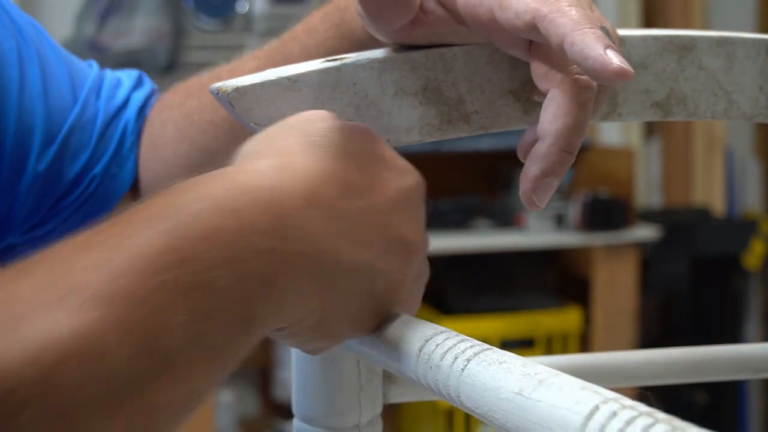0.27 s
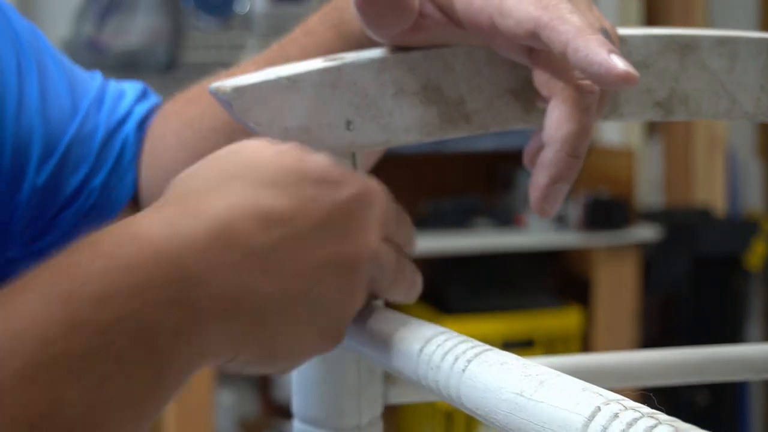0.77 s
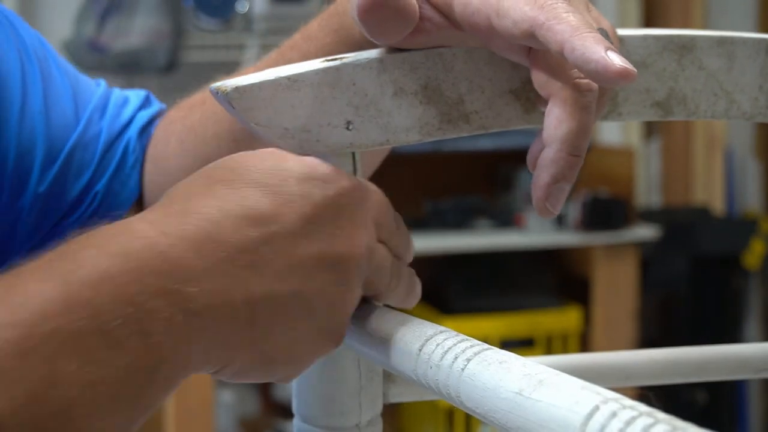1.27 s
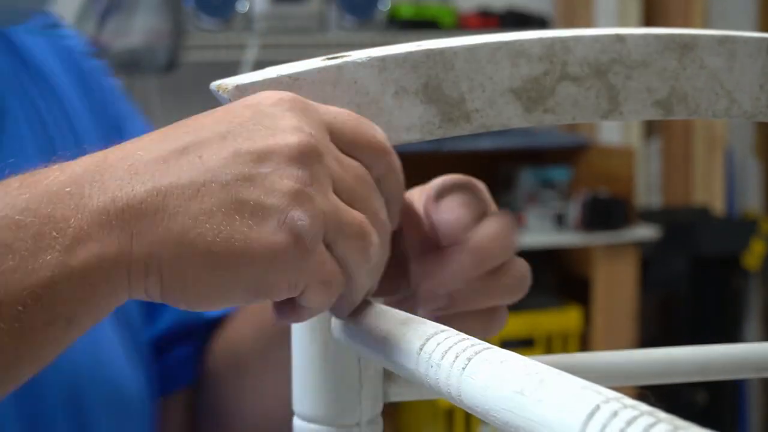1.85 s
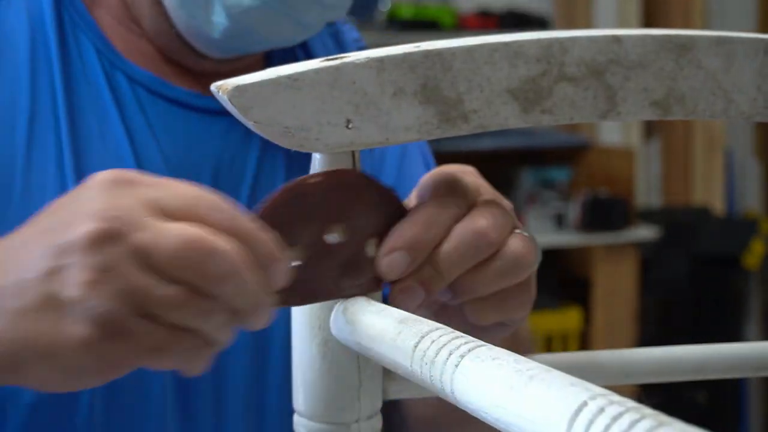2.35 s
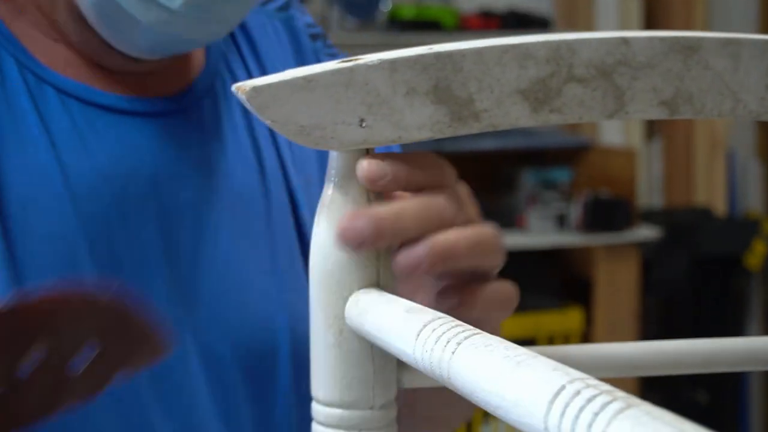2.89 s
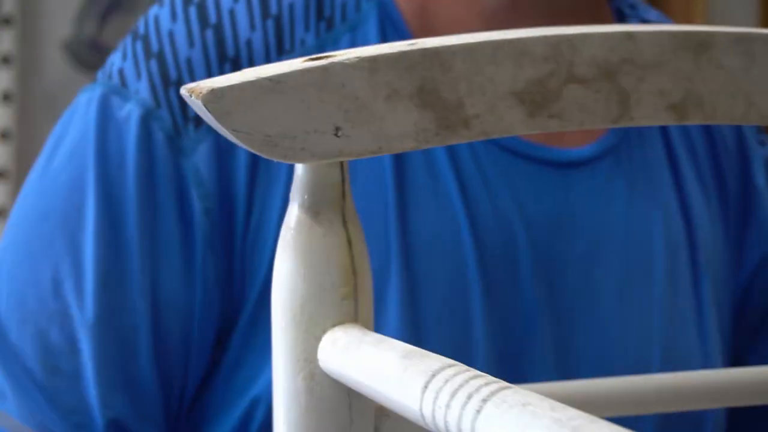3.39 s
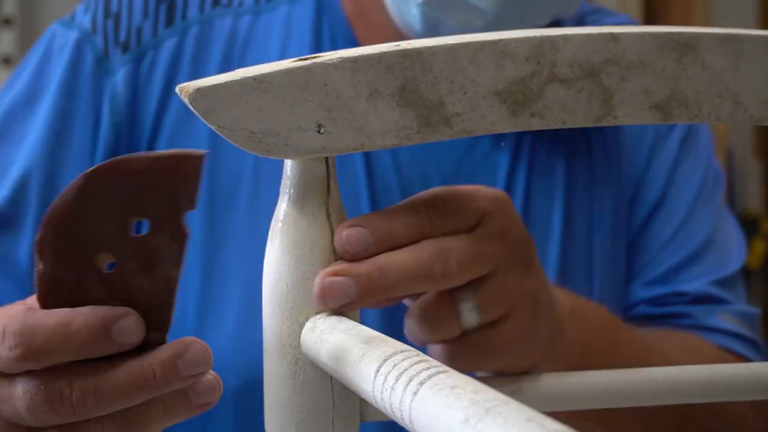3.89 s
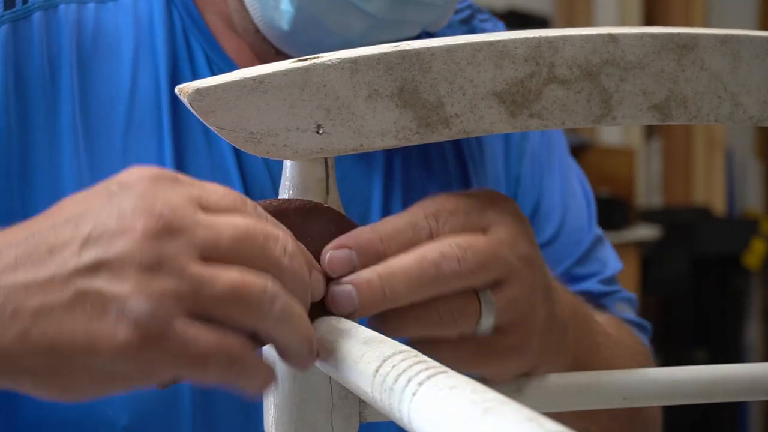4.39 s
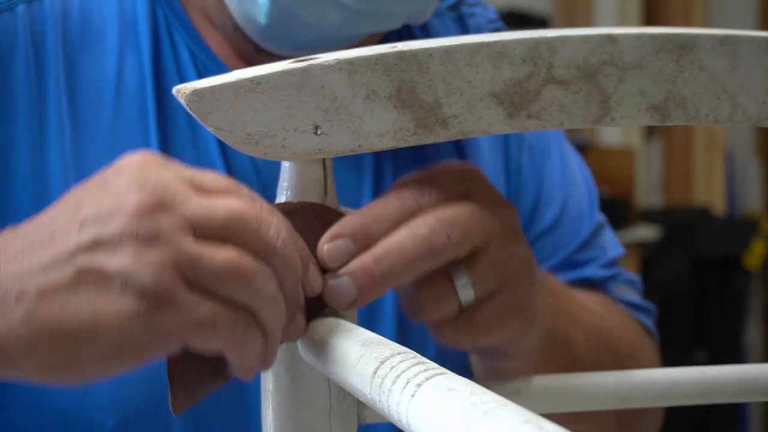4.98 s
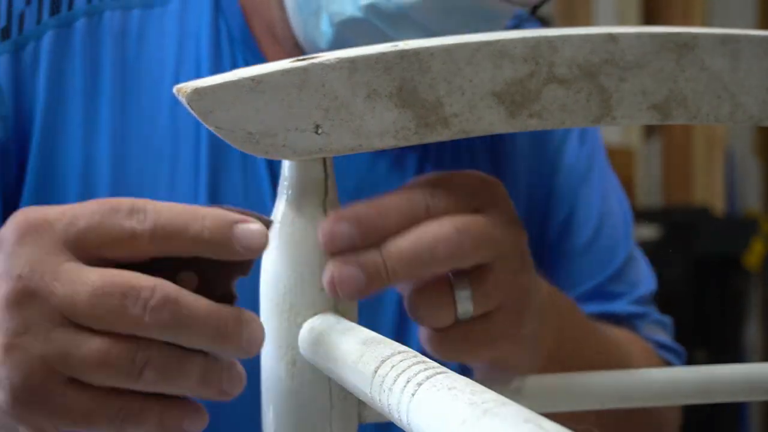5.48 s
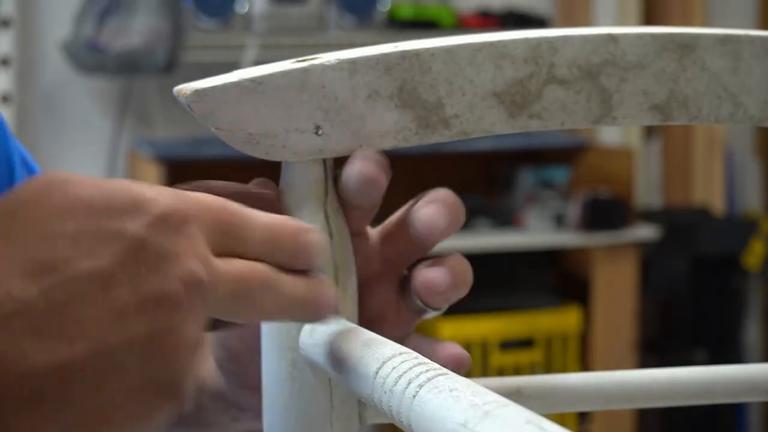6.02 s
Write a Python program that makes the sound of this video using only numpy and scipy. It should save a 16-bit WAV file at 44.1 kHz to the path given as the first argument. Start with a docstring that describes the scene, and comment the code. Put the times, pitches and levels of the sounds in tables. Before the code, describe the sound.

A close, speeded-up stereo sound of hand sanding on a wooden chair in a workshop. From 0 to 1.4 s, rapid raspy strokes, about 20 to 50 a second, chatter in uneven runs, gritty and hissy with a hollow woody boom and brief squeaky catches; a soft knock falls at 0.3. From 1.5 to 2 s there are only faint ticks and scuffs. Brighter, papery strokes run from 2.0 to 2.75, then heavy dull knocks with rattles and scuffs land near 2.85 and 3.1, the loudest moment. Soft slides and a scuff near 3.4 fade into a quiet gap. Sanding resumes at 4.2, lighter and drier, with soft knocks around 5 to 5.25. After a lull, paper slides at 5.7 and last quick strokes come near 6. Deep rumble swells irregularly throughout, strongest around 3 s, over faint room air and a thin high insect band; the stereo image shifts abruptly.

```python
"""A painted wooden chair leg is sanded by hand in a workshop, heard speeded up: runs of 20-50 strokes a second.
From the start, grit clicks hiss and ring the wood through resonators, over swelling deep noise and room air,
with a thin band of insects (narrow noise) outside; the phase between the channels jumps about throughout.
Slides, scuffs and dull thuds (shaped grain noise) come among the strokes and in the pauses; knocks on the chair
(decaying modes) peak near 3 s. Sanding resumes at 4.2 s, with softer knocks near 5 s and last strokes at 6 s."""
import sys
import numpy as np
from scipy import signal
from scipy.fft import rfft, irfft
from scipy.io import wavfile
from scipy.ndimage import uniform_filter1d

SR = 44100
rng = np.random.default_rng(int(sys.argv[2]) if len(sys.argv) > 2 else 0)


def file_out(sig):
    """Save sig as 16-bit WAV at sys.argv[1]."""
    # one column per channel
    cols = np.atleast_2d(sig).T
    # limit, then scale
    lim = np.clip(cols, -1, 1)
    pcm = np.round(lim * 32767).astype(np.int16)
    wavfile.write(sys.argv[1], SR, pcm)


N = 275625
TIME = np.arange(N) / SR   # s
HZ = np.maximum(np.arange(N // 2 + 1) * SR / N, 1)   # spectral bins, kept above zero for the logarithm

# the hold on the leg: [t/s, boom of the wood re body/dB, lift of lower and cut of upper resonances/dB,
# thump of the frame re body/dB, ring of the bent paper/dB]
HAND_HOLD = [(0, -3.5, 10.5, -29, -8), (1.15, -5.5, 10.5, -6.5, 10), (1.45, -3, 12.5, -24.5, 12),
             (2, -0.5, 9.5, -16, 9), (2.45, -4.5, 8, -20, 23.5), (2.8, -3.5, 6, -15.5, 9),
             (4.15, -1, 8, -22, 6), (4.4, -3, 3, -29, 18), (5.0, -7.5, 5, -8.5, 12), (5.3, -6, 3, -18, -14),
             (5.8, -7.5, 15.5, -38, -2), (6.1, -3.5, -1.5, -14, 4)]


def from_db(db):
    """Amplitude ratio: 20 dB is a factor of ten."""
    return 10 ** (np.asarray(db) / 20)


def rms_one(x):
    """Normalization by the root mean square."""
    return x / np.sqrt(np.mean(x ** 2) + 1e-20)


def in_time(rows):
    """Linear interpolation of each column over time."""
    s, *columns = np.transpose(rows)
    return [np.interp(TIME, s, c) for c in columns]


def colour(x, spectrum):
    """Spectral shaping: gain in dB is linear in log frequency, silent far outside the curve; rms 1."""
    hz, db = np.transpose(spectrum)
    gain = from_db(np.interp(np.log(HZ), np.log(hz), db, left=-110, right=-110))
    return rms_one(irfft(rfft(x) * gain, N))


def drift(rate):
    """Slow random modulation: normal values, rate per second, joined by straight lines."""
    knots = rng.standard_normal(800)
    return np.interp(TIME * rate, np.arange(800), knots)


def grains(per_s, uneven_db):
    """Shot noise: dense clicks at random moments, of random size and sign."""
    sizes = from_db(uneven_db * np.minimum(rng.exponential(1, N), 4)) * rng.choice([-1, 1], N)
    return rms_one(sizes * (rng.random(N) < per_s / SR))


def resonance(x, hz, width_hz):
    """Damped resonator: a two-pole band-pass of about unit gain at its peak."""
    r = np.exp(-np.pi * width_hz / SR)
    zeros = np.array([1, 0, -1]) * (1 - r * r) / 2
    poles = [1, -2 * r * np.cos(2 * np.pi * hz / SR), r * r]
    return signal.lfilter(zeros, poles, x)


def evened(x):
    """Envelope normalization: slow changes of level are divided out; rms 1."""
    power = uniform_filter1d(uniform_filter1d(x ** 2, size=700), size=700)
    return rms_one(x / np.sqrt(power + 1e-12))


def background():
    """Broadband and narrow-band noise: room air and a far chorus of insects."""
    # room air: [f/Hz, level/dB]
    air_spectrum = [(100, -2), (300, -9.5), (1000, -17), (3000, -28), (6000, -34.5), (15000, -49.5)]
    air_db, insect_db = -46, -59
    insect_hz, insect_width_hz = 7520, 880
    chorus = resonance(rng.standard_normal(N), insect_hz, insect_width_hz)
    chorus = rms_one(resonance(chorus, insect_hz, insect_width_hz))
    air = colour(rng.standard_normal(N), air_spectrum)
    air_swell, chorus_swell = from_db(1.5 * drift(8)), from_db(1.2 * drift(8))
    return from_db(insect_db) * chorus_swell * chorus + from_db(air_db) * air_swell * air


def rumble():
    """Amplitude modulation: deep noise, its own slow swells evened out, follows a level curve."""
    # deep noise: [f/Hz, level/dB]
    deep_spectrum = [(7.1, -22), (12, 3), (43, 5.5), (55, 3), (67, -3.5), (86, -10.5), (130, -51),
                     (170, -39)]
    # swells of the rumble: [t/s, level/dB]
    rumble_levels = [(0.0, -21), (0.09, -17), (0.14, -22), (0.33, -18), (0.465, -31), (0.575, -19),
                     (0.7, -24.5), (0.84, -15), (0.92, -28), (1.085, -15), (1.405, -24.5), (1.585, -19.5),
                     (1.785, -33.5), (2.025, -29), (2.105, -16.5), (2.175, -23.5), (2.405, -18),
                     (2.78, -13.5), (2.865, -8), (3.04, -25.5), (3.135, -7.5), (3.34, -21.5), (3.465, -14),
                     (3.645, -31), (3.765, -21), (3.985, -32), (4.25, -20), (4.5, -25), (4.68, -16),
                     (5.365, -17), (5.5, -31), (5.825, -32), (6.03, -18), (6.14, -32.5), (6.245, -35)]
    deep = colour(rng.standard_normal(N), deep_spectrum)
    power = uniform_filter1d(uniform_filter1d(deep ** 2, size=1500), size=1500)
    steady = rms_one(deep / np.sqrt(power + 0.014))
    return from_db(in_time(rumble_levels)[0]) * steady


def slide(s, rise_s, hold_s, fall_s):
    """Near-exponential envelope: the level in dB rises, holds and falls away."""
    edge_db, slope_exponent = 50.5, 0.83   # loss one rise or fall time away from the hold
    away = np.maximum(np.maximum((s - TIME) / rise_s, (TIME - s - hold_s) / fall_s), 0)
    return from_db(-edge_db * np.minimum(away, 4) ** slope_exponent)


def shuffle():
    """Friction as shaped shot noise: slides, scuffs and dull noisy thuds, and paper drawn lightly."""
    # slides, scuffs and dull noisy thuds, some during strokes or knocks:
    # [t when full/s, rise/s, hold/s, fall/s, dull level/dB, bright level/dB]
    scuff_rows = [(1.543, 0.031, 0.022, 0.5, -46.5, -51), (1.947, 0.75, 0.044, .04, -45.5, -43.5),
                  (2.721, 0.072, 0.027, 0.1, -35.5, -42), (2.836, 0.0078, 0.032, 0.073, -27, -33.5),
                  (3.021, 0.034, 0.014, 0.27, -33.5, -40), (3.114, 0.03, 0.0088, 0.1, -19.5, -40),
                  (3.299, 0.015, 0.089, 0.063, -52.5, -49.5), (3.407, 0.17, 0.057, 0.089, -29.5, -35),
                  (3.538, 0.03, 0.15, 0.065, -39, -44), (3.847, .04, 0.073, 0.34, -50, -48),
                  (3.897, 0.037, 0.016, 0.06, -50, -76), (4.011, 0.17, 0.081, 0.18, -54, -49),
                  (4.196, 0.012, 0.0022, 0.036, -31.5, -50), (5.177, 0.064, 0.157, 0.098, -43.5, -64),
                  (5.712, 0.093, 0.021, 0.12, -41, -46), (5.799, 0.089, 0.017, 0.22, -48, -40),
                  (6.025, 0.58, 0.079, 0.16, -49.5, -46)]
    # paper drawn along the leg: [t when full/s, rise/s, hold/s, fall/s, level/dB]
    drag_rows = [(4.193, .05, 0.23, 0.13, -46), (5.313, 0.058, 0.2, 0.16, -43),
                 (5.81, 0.058, 0.047, 0.054, -39.5), (6.096, 0.059, .2, .1, -48)]
    # dull part, bright part and paper drag: [f/Hz, level/dB]
    dull_spectrum = [(100, -2.5), (250, -3), (500, -4.5), (1000, -10.5), (1500, -16), (2500, -73)]
    bright_spectrum = [(800, -40), (1600, 9.5), (2500, 6.5), (4000, 3.5), (5000, -5.5), (7000, -9.5),
                       (10000, -25)]
    drag_spectrum = [(400, -51), (560, 8), (800, -11), (1200, 1), (1600, -20), (1950, 6.5), (2550, -2.5),
                     (2900, -14), (5000, -14.5)]
    dull_level, bright_level = np.zeros(N), np.zeros(N)
    for *times, dull_db, bright_db in scuff_rows:
        shape = slide(*times)
        dull_level += from_db(dull_db) * shape
        bright_level += from_db(bright_db) * shape
    drag_level = sum(from_db(db) * slide(*times) for *times, db in drag_rows)
    rub = grains(per_s=6000, uneven_db=2) * from_db(2 * drift(45))
    drag = colour(grains(per_s=19000, uneven_db=-6.5), drag_spectrum)
    dull, bright = colour(rub, dull_spectrum), colour(rub, bright_spectrum)
    return dull_level * dull + bright_level * bright + drag_level * drag


def knocks():
    """Modal impact: a soft contact builds up over some ms, strikes every mode nearly in step and rattles."""
    # knocks on the chair: [t/s, relative level/dB, contact/ms]
    knock_rows = [(0.304, -17, 7.1), (2.685, -21, 2.8), (2.833, -21.5, 0.48), (2.855, -9, 8.4),
                  (3.102, -22.5, 3.6), (3.112, -19, 0.62), (3.118, -8, 2.25), (3.168, -17.5, 4.2),
                  (3.195, -18, 3.3), (4.191, -40, 0.45), (4.8, -28.5, 3.9), (4.915, -29, 5.6),
                  (4.988, -22.5, 3.2), (5.056, -25.5, 2.2), (5.185, -15.5, 11), (5.24, -17.5, 8.7)]
    # modes of the struck chair: [f/Hz, relative level/dB, decay by 60 dB/s]
    chair_modes = [(53.9, 12.5, 0.26), (223, 12.5, 0.035), (245, 2, 0.068), (308.3, 5.5, 0.074),
                   (390, -3.5, 0.2), (479, 23.5, 0.017), (673, 2, 0.073), (910, 5, 0.027)]
    crack_db, crack_delay_s, crack_decay_s = -22, .004, 0.0015
    rattle_db, rattle_decay_s = -13, 0.013   # the joints rattle
    out = np.zeros(N)
    luck_db = rng.normal(0, 3, (len(knock_rows), len(chair_modes)))
    turns = rng.random((len(knock_rows), len(chair_modes)))
    hz, db, t60 = np.transpose(chair_modes)[:, :, None]
    after = np.arange(SR // 3) / SR
    hiss = np.diff(rng.standard_normal((len(knock_rows), len(after) + 1)))
    rattle_hz = np.arange(len(after) // 2 + 1) * SR / len(after)
    build_up = 1 - np.exp(-(after / 0.0067) ** 2)
    for k, (s, level_db, contact_ms) in enumerate(knock_rows):
        # a longer contact excites less of the treble
        strength = from_db(db + luck_db[k, :, None] - 60 * after / t60) / (1 + (hz * contact_ms / 1000) ** 2)
        cycles = hz * (after - 0.008) + 0.21 + 0.39 * (turns[k, :, None] - .5)
        ring = build_up * np.sum(strength * np.sin(2 * np.pi * cycles), axis=0)
        softness = (1 + (rattle_hz * contact_ms / 1000) ** 2) * (1 + (rattle_hz / 3500) ** 4)
        rattle = rms_one(irfft(rfft(hiss[k]) / softness, len(after)))
        ring += build_up * rattle * from_db(rattle_db) * np.exp(-after / rattle_decay_s)
        crack_shape = (after > crack_delay_s) * np.exp(-np.abs(after - crack_delay_s) / crack_decay_s)
        crack = signal.lfilter([1], [1, -.9], hiss[k]) * crack_shape
        ring += from_db(crack_db) / (1 + (contact_ms / 2) ** 2) * signal.lfilter([1], [1, -.75], crack)
        at = round(s * SR)
        out[at:at + len(after)] += from_db(level_db - 1.5) * ring[:N - at]
    return out


def strokes():
    """Reciprocating motion: rows (s, body dB, treble re body dB) in order; each second one of a run goes back."""
    # lone strokes: [t at the middle/s, body level/dB, treble re body/dB]
    lone_rows = [(0.31, -36.5, -5.5), (0.37, -29, -10.5), (0.499, -30.5, -18), (0.564, -29, -13),
                 (0.599, -34.5, -12), (0.65, -36, -16), (0.897, -48, -20), (2.025, -38, -10),
                 (2.066, -33.5, -8), (2.8, -29, -22), (2.845, -45, -1), (2.893, -29.5, -7),
                 (2.992, -47, -18), (3.016, -28.5, -9.5), (4.164, -38.5, 2.5), (4.749, -39.5, -2),
                 (4.787, -45, -14), (4.818, -33.5, -7), (5.834, -37, -7), (5.871, -42, -11),
                 (5.911, -32, -12), (6.045, -34.5, -8.5)]
    # runs of even strokes: [first t/s, last t/s, strokes, first level/dB, last level/dB, treble re body/dB,
    # back stroke early/ms, back stroke brighter/dB, back stroke weaker/dB]
    run_rows = [(0.007, 0.266, 7, -31.5, -28, -13, -3.5, 4, 2),
                (0.69, 0.859, 5, -29.5, -35.5, -14, 1, 6.5, 2),
                (0.937, 1.033, 5, -32, -35.5, -10.5, 1.5, 3, 5),
                (1.053, 1.095, 3, -40.5, -43.5, -11, -4, -5, -2),
                (1.12, 1.261, 8, -35, -38, -10.5, 2.1, 8, 2.5),
                (1.281, 1.426, 5, -36.5, -33.5, -12.5, 2.5, 7, 1.5),
                (2.113, 2.299, 5, -33.5, -32.5, -8, 3, -0.5, 0.9),
                (2.355, 2.754, 9, -33, -37, -5, 3, -1.5, -1.5),
                (4.197, 4.306, 5, -35.5, -46.5, -5.5, -1, 0.5, -3.5),
                (4.376, 4.566, 7, -39.5, -39, -8.5, 1.8, 6, -2),
                (4.603, 4.721, 5, -35.5, -31.5, -3.5, 2, 5, 4),
                (4.854, 5.086, 8, -33.5, -36, -7, 2, 3, -0.2), (5.12, 5.28, 6, -33, -32, -7, 3.5, 5, -1.7),
                (5.948, 6.019, 3, -29.5, -28, -10.5, -2, 1.5, -3)]
    uneven_db = 2   # chance from stroke to stroke
    rows = list(lone_rows)
    for first, last, count, first_db, last_db, treble_db, early_ms, brighter_db, weaker_db in run_rows:
        count = round(count)
        along, back = np.linspace(0, 1, count), np.arange(count) % 2
        luck_db = uneven_db * rng.standard_normal((count, 2))
        s = first + along * (last - first) - back * early_ms / 1000
        db = first_db + along * (last_db - first_db) - back * weaker_db + luck_db[:, 0]
        rows += zip(s, db, treble_db + back * brighter_db + luck_db[:, 1])
    return sorted(rows)


def swells(rows, fill, longest_s):
    """Level follows speed: body and treble of each stroke swell and fade with the hand's motion."""
    shortest_s = 0.017   # least half length, unless longest_s is less
    bite = .8   # under 1: a stroke starts faster than it ends
    s, db, treble_db = np.transpose(rows)
    gaps = np.diff(s, prepend=-1, append=99)
    half = np.clip(fill * np.minimum(gaps[:-1], gaps[1:]), shortest_s, longest_s)
    body, treble = np.zeros(N), np.zeros(N)
    for k in range(len(s)):
        at = slice(max(round((s[k] - half[k]) * SR), 0), round((s[k] + half[k]) * SR))
        along = np.clip((TIME[at] - s[k]) / half[k] / 2 + .5, 0, 1)
        speed = np.sin(np.pi * along ** bite) ** 2
        body[at] += from_db(db[k]) * speed
        treble[at] += from_db(db[k] + treble_db[k]) * speed ** 1.48
    return body, treble


def leg(x, ring_db):
    """Parallel resonances of the wood join the sound; the hold favours lower or upper ones, with some chance."""
    # the leg when rubbed: [f/Hz, width/Hz, relative level/dB]
    leg_modes = [(1755, 30, -4), (2121, 150, 1), (2448, 50, -4), (3150, 1500, 6), (3445, 62, 12.5),
                 (3850, 730, -2), (6040, 114, 0)]
    lower_db = in_time(HAND_HOLD)[1]
    rings = 0
    for hz, width, db in leg_modes:
        grip_db = 4 * drift(22) + lower_db * np.sign(2900 - hz)
        rings = rings + from_db(db + grip_db) * resonance(x, hz, width)
    return x + from_db(ring_db) * rings


def catches(grit):
    """Brief resonant excitation: the grit catches and the wood rings out, each time at one pitch."""
    # catches: [t at the middle/s, f/Hz, level/dB]
    catch_rows = [(0.367, 1900, -31.5), (0.492, 2310, -35), (0.564, 2040, -31.5), (0.687, 2470, -36),
                  (0.857, 2400, -36), (1.158, 3620, -34.5), (5.05, 2290, -25)]
    spread_s, width_share = .005, .07   # time to 1/e on either side; width over pitch
    out = np.zeros(N)
    for s, hz, db in catch_rows:
        burst = np.exp(-((TIME - s) / spread_s) ** 2)
        out += from_db(db) * burst * evened(resonance(grit, hz, width_share * hz))
    return out


def sanding():
    """Source and filter: grit tears at the paint in dense clicks that ring the wood, frame and bent paper."""
    # short light strokes and ticks: [t at the middle/s, body level/dB, treble re body/dB]
    short_rows = [(0.39, -38, -5), (1.008, -34.5, -4), (1.549, -43, -30), (1.65, -44, -10),
                  (1.665, -51, -14), (1.748, -51, -11), (1.883, -37.5, -16), (5.474, -48, 1.5),
                  (5.486, -52, 1), (6.102, -45, -13)]
    # scrape, treble and boom of the grit: [f/Hz, level/dB]
    scrape_spectrum = [(900, -94), (1500, -17), (2200, 6), (4000, 3.5), (5000, -2), (7000, -5.5)]
    treble_spectrum = [(3500, -84), (5000, -17.5), (7000, -8.5), (8500, -5.5), (10000, -9.5),
                       (12500, -17.5), (16000, -23)]
    boom_spectrum = [(120, 12), (300, -6), (550, 4), (1000, 0.5), (1300, -3), (2000, -10.5)]
    # the hollow of the paper bent round the leg: [f/Hz, width/Hz, relative level/dB]
    paper_modes = [(1670, 49, 2.5), (3170, 130, -13.5)]
    frame_hz, frame_width_hz = 297.7, 38
    treble_late_s = 0.0027   # the hiss of a stroke lags its body
    stroke_levels = swells(strokes(), fill=0.64, longest_s=0.039)
    body, treble = np.add(stroke_levels, swells(short_rows, fill=0.97, longest_s=0.0097))
    # the near walls carry each stroke a little way into the next
    fade = np.exp(-1 / (0.063 * SR))
    body += from_db(-14.0) * signal.lfilter([1 - fade], [1, -fade], body)
    treble = np.interp(TIME - treble_late_s, TIME, treble)
    treble += from_db(-12) * uniform_filter1d(treble, size=1800)
    grit = grains(per_s=14000, uneven_db=2.5) * from_db(1.3 * drift(110))
    boom_db, _, thump_db, paper_db = in_time(HAND_HOLD)
    boom = from_db(boom_db) * rms_one(leg(colour(grit, boom_spectrum), ring_db=17.5))
    frame = resonance(resonance(grit, frame_hz, frame_width_hz), frame_hz, frame_width_hz)
    thump = from_db(thump_db + 4.1 * drift(23.2)) * rms_one(frame)
    scrape = colour(grit, scrape_spectrum)
    paper = from_db(paper_db) * sum(from_db(db) * resonance(scrape, hz, width) for hz, width, db in paper_modes)
    body_sound = evened(leg(scrape, ring_db=-7.5) + paper) + boom + thump
    treble_sound = evened(leg(colour(grit, treble_spectrum), ring_db=15.5))
    return body * body_sound + treble * treble_sound + catches(grit)


def lead_at(hz, s):
    """Interchannel phase: the lead of left over right that the latest jump has left at each pitch and moment."""
    # jumps, each held until the next in its range: [t/s, lowest f/Hz, upper f/Hz, lead/rad]
    jump_rows = [(0, 0, 550, 1.5), (0, 550, 1900, -1.4), (0, 1900, 3600, 2), (0, 3600, 30000, .2),
                 (.34, 1900, 30000, -1.4), (.51, 0, 500, 3), (.56, 0, 500, -1), (1.09, 1900, 30000, -.1),
                 (1.33, 1500, 3000, 1.2), (1.5, 500, 30000, -.9), (1.85, 1450, 1900, .8),
                 (1.85, 1900, 2350, 3), (1.85, 2350, 4200, -.4), (1.85, 4100, 5300, 2.2),
                 (1.85, 5300, 30000, -1.9), (2.2, 600, 1450, .6), (2.37, 0, 600, .6), (2.33, 1300, 1900, 3),
                 (2.43, 1900, 2300, .4), (2.43, 2300, 30000, 2.6), (2.53, 5800, 7600, .8),
                 (2.63, 5800, 7600, 2.4), (2.72, 1300, 30000, .5), (4.12, 2400, 30000, -2.5),
                 (4.22, 600, 1150, 3.1), (4.34, 0, 600, -3), (4.57, 3000, 4200, 0),
                 (4.765, 1150, 30000, 3.1), (4.79, 1750, 2350, 2), (4.845, 1000, 30000, 1.7),
                 (4.9, 550, 1000, 2.2), (4.97, 550, 2600, 3.14), (5.03, 420, 750, 1), (5.1, 0, 30000, .75),
                 (5.31, 700, 30000, -2), (5.58, 4000, 30000, .5), (5.97, 0, 1100, 2.8),
                 (6.06, 400, 800, -1.5), (6.08, 1300, 30000, -1.9)]
    lead = np.zeros(np.broadcast(hz, s).shape)
    for start, from_hz, to_hz, radians in jump_rows:
        lead[(s >= start) & (hz >= from_hz) & (hz < to_hz)] = radians
    return lead


def blotches(shape, frames, bins):
    """Correlated random field: noise smoothed over frequency and time, rms 1."""
    field = rng.standard_normal(shape)
    for _ in range(2):
        field = uniform_filter1d(field, size=max(round(bins), 1), axis=0)
        field = uniform_filter1d(field, size=max(round(frames), 1), axis=1)
    return rms_one(field)


def right_channel(left, ragged, stray_above, waver):
    """Short-time phase rotation of the left side, range by range, with ragged borders and stray patches."""
    hz, s, cells = signal.stft(left, SR, nperseg=1024, noverlap=768)
    wandering_hz = hz[:, None] * np.exp(ragged * blotches(cells.shape, frames=55, bins=8))
    lead = lead_at(wandering_hz, s)
    # patches, more of them above the bass, break away to a phase of their own
    upper = np.clip(hz[:, None] / 1200, 0, 1)
    stray_reach = np.clip(hz[:, None] / 1500, .6, 1)
    stray = blotches(cells.shape, frames=14, bins=7) * stray_reach > stray_above
    lead = np.where(stray, 2.05 * np.sign(blotches(cells.shape, frames=15, bins=20)), lead)
    lead = lead + waver * upper * blotches(cells.shape, frames=3, bins=3)
    return signal.istft(cells * np.exp(-1j * lead), SR, nperseg=1024, noverlap=768)[1][:N]


def right_rumble(deep):
    """Analytic-signal rotation: the rumble is turned as a whole by the lead in the bass."""
    turn = np.exp(-1j * lead_at(50, TIME))
    turn = uniform_filter1d(turn.real, size=900) + 1j * uniform_filter1d(turn.imag, size=900)
    return (signal.hilbert(deep) * turn).real


def scene():
    """Superposition: all sources add on the left; the right follows with its phase turned."""
    near, deep = sanding() + shuffle() + background() + knocks(), rumble()
    right = from_db(0.12) * right_channel(near, ragged=.07, stray_above=.95, waver=0.42) + right_rumble(deep)
    return np.array([near + deep, right])


def record(dry):
    """Overload and band limit: peaks are clipped, then the top is cut by 60 dB from 16050 Hz up."""
    top_cut = signal.cheby2(12, 60, 16050, fs=SR, output="sos")
    return signal.sosfilt(top_cut, np.clip(dry, -.99, .99))


dry = scene()
out = record(dry)
file_out(out)
```